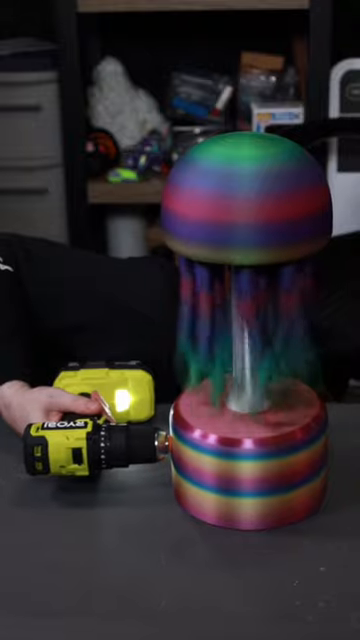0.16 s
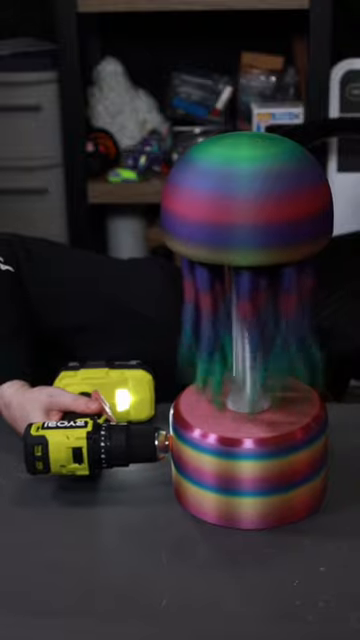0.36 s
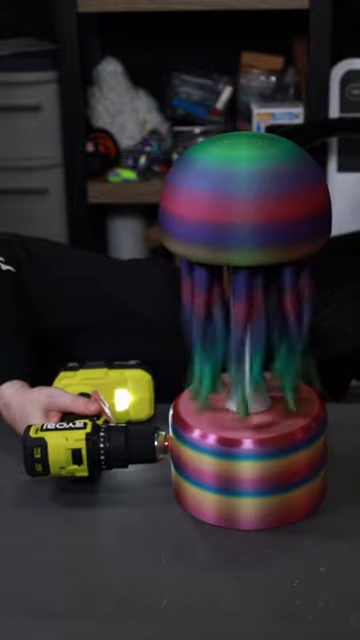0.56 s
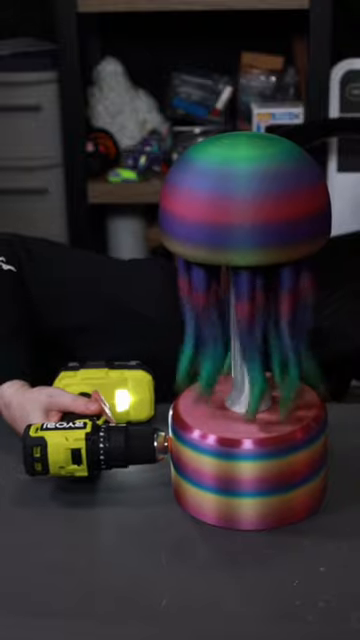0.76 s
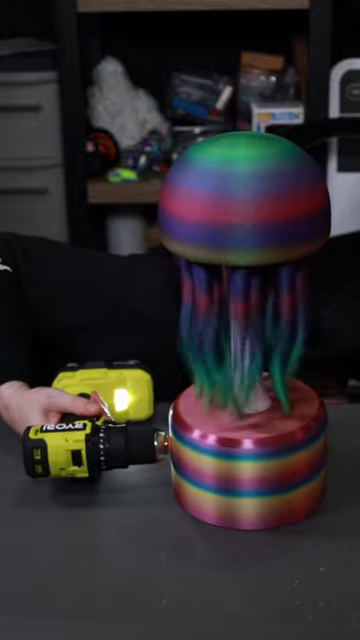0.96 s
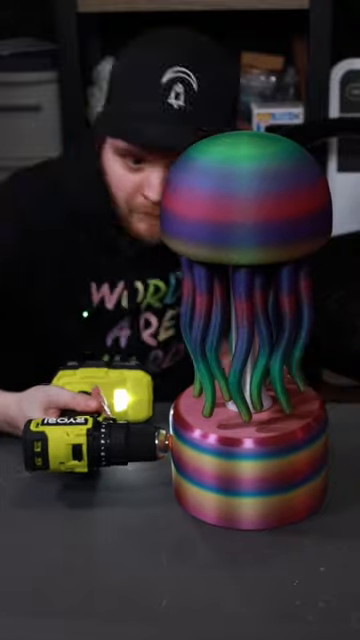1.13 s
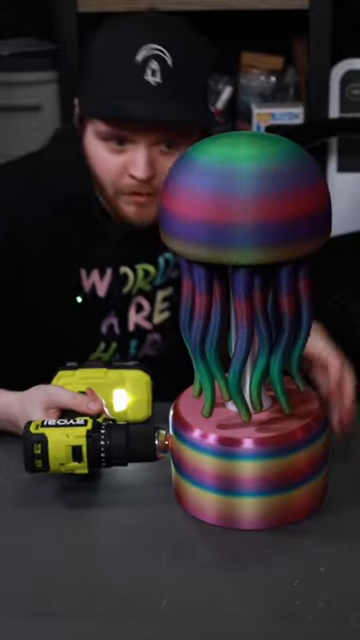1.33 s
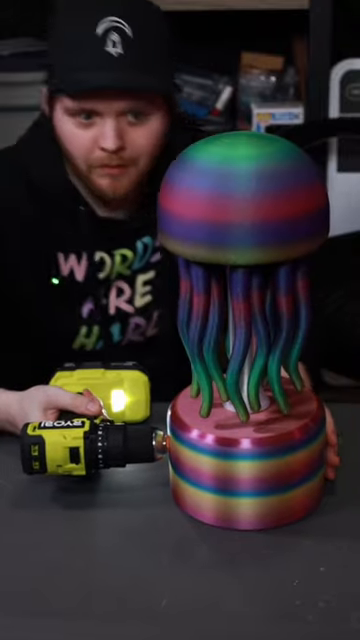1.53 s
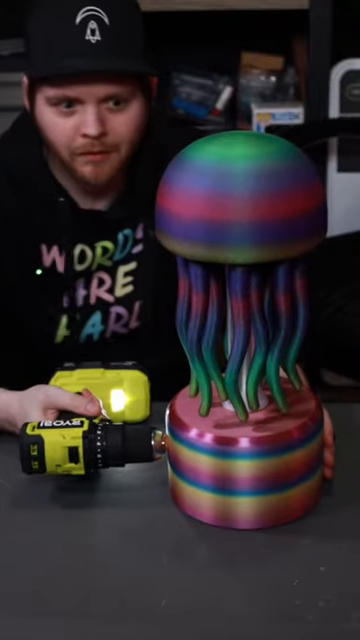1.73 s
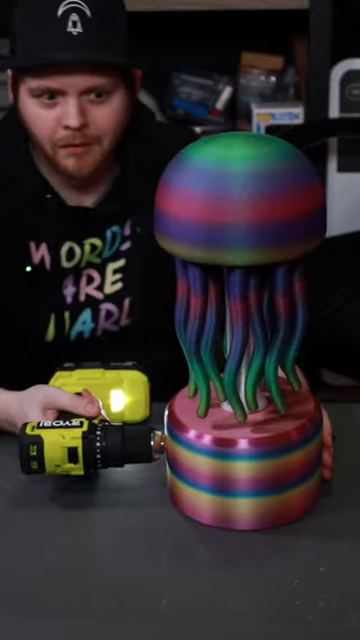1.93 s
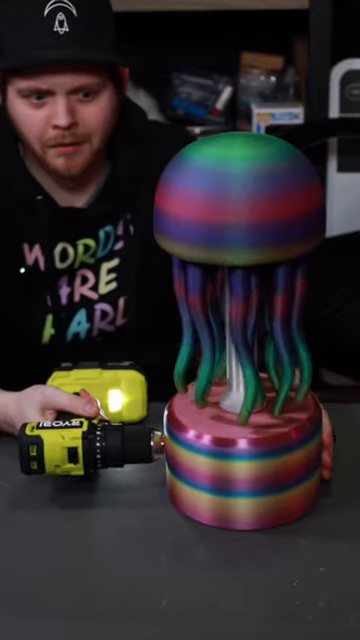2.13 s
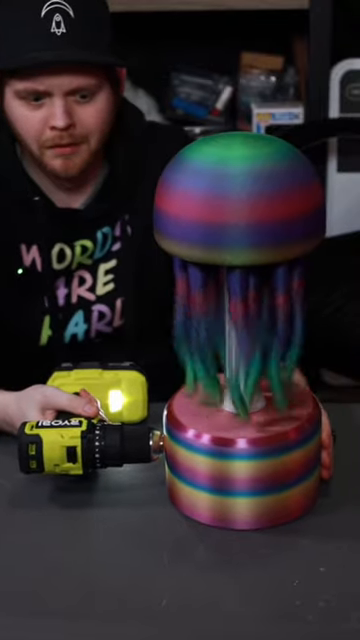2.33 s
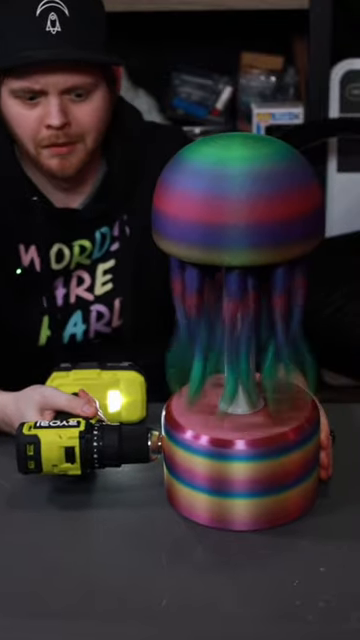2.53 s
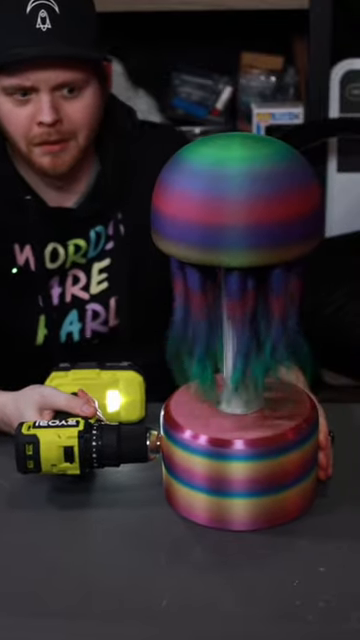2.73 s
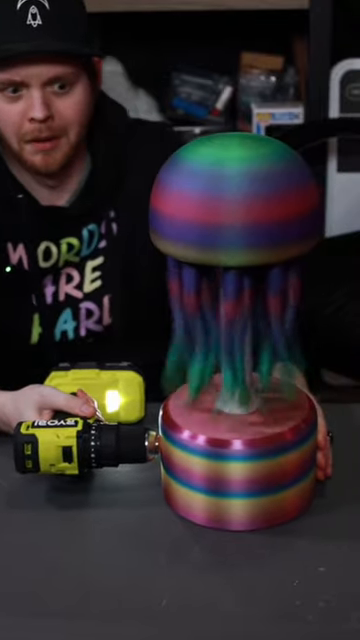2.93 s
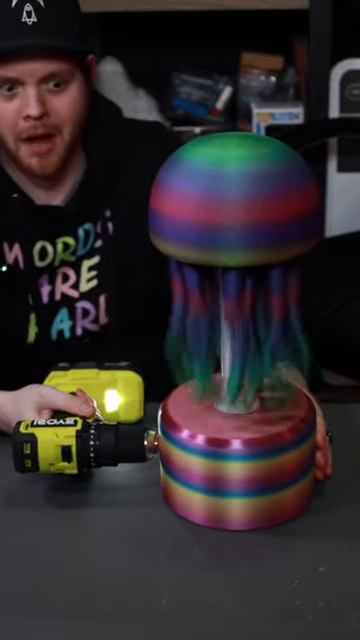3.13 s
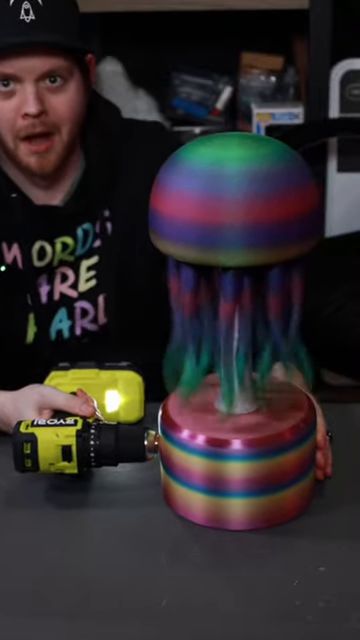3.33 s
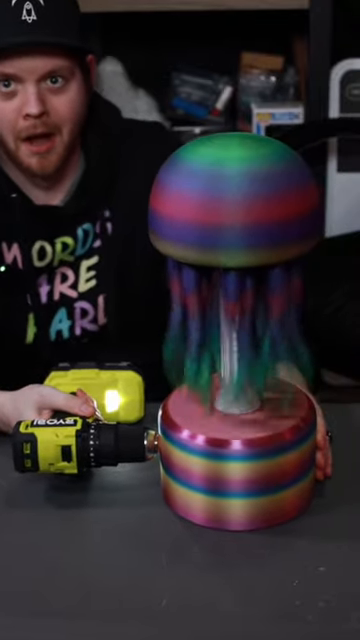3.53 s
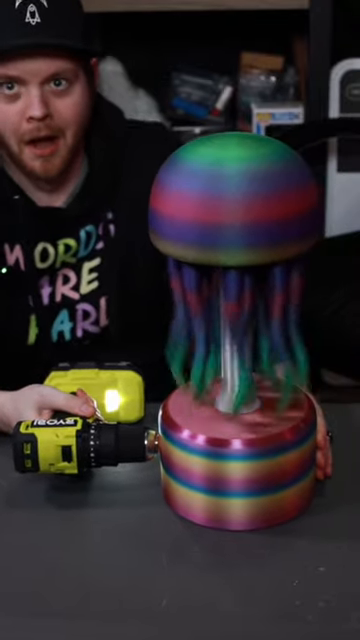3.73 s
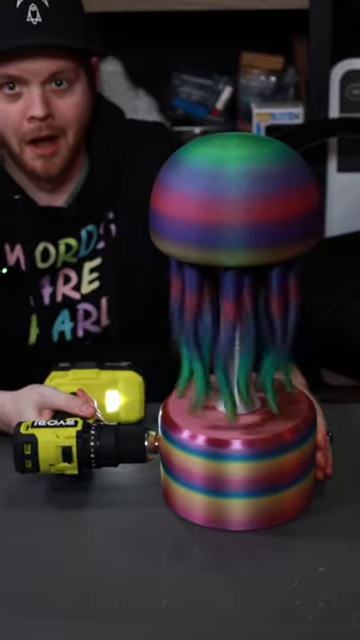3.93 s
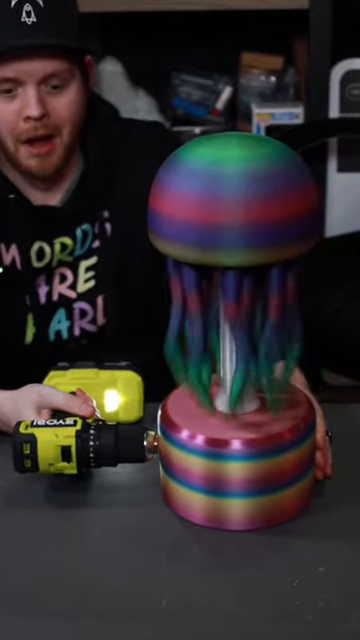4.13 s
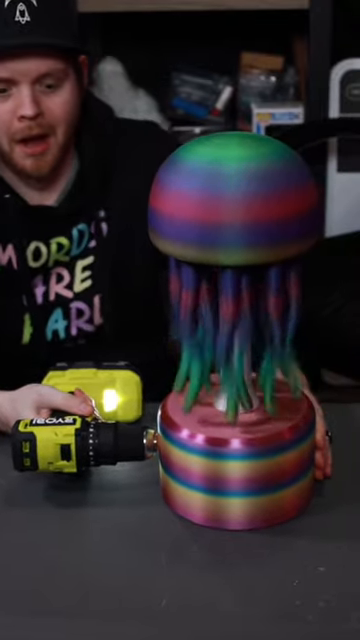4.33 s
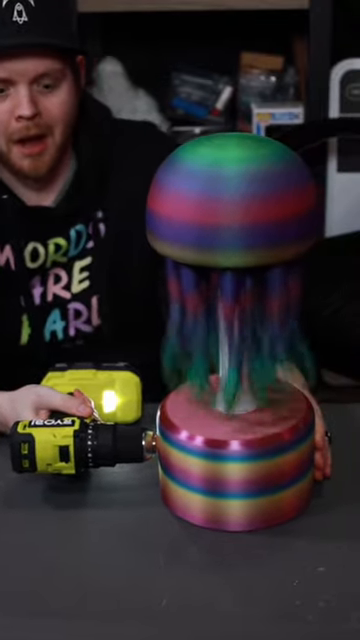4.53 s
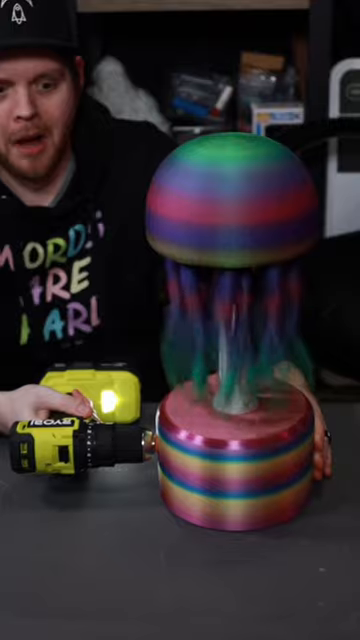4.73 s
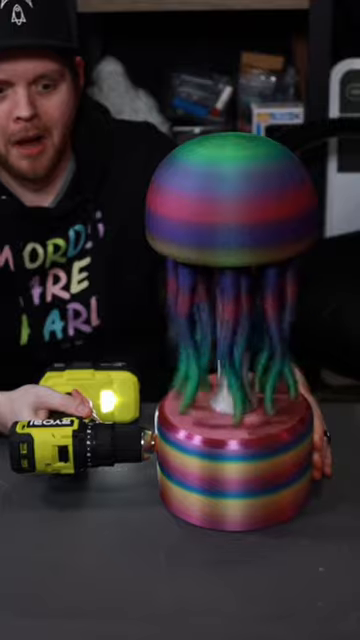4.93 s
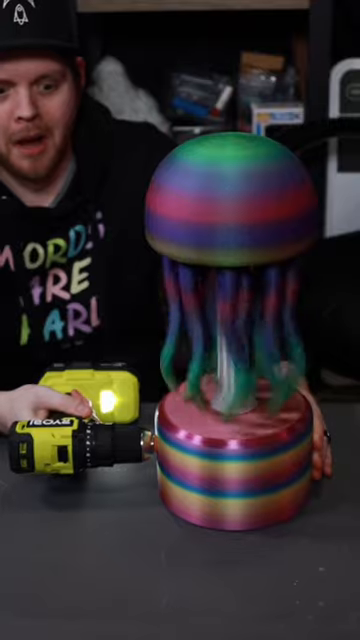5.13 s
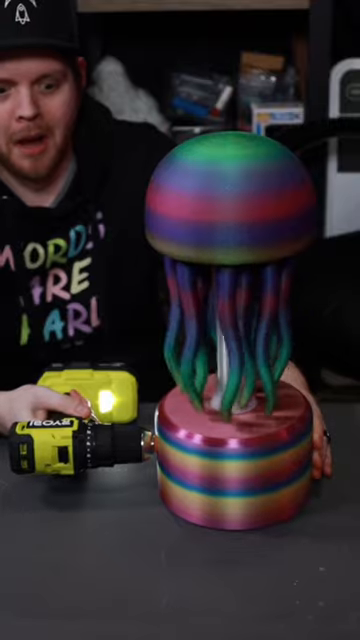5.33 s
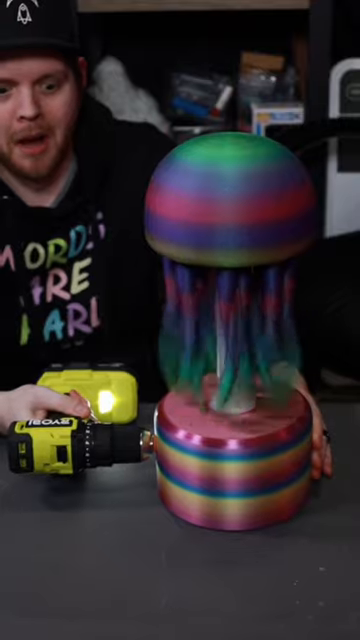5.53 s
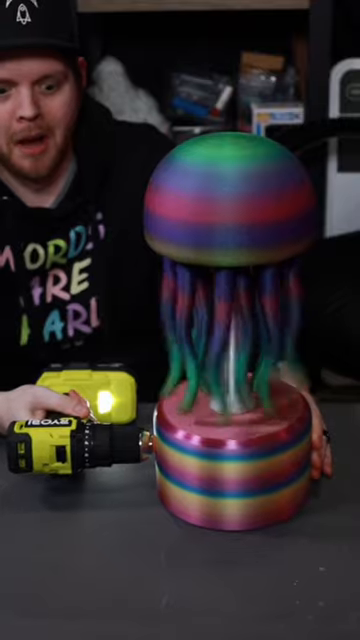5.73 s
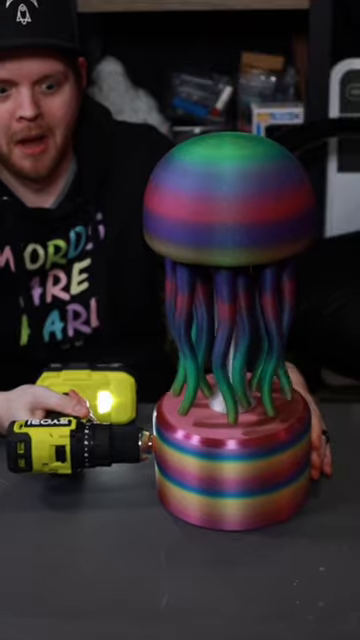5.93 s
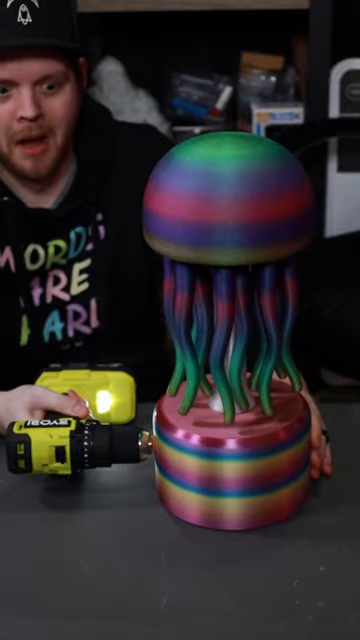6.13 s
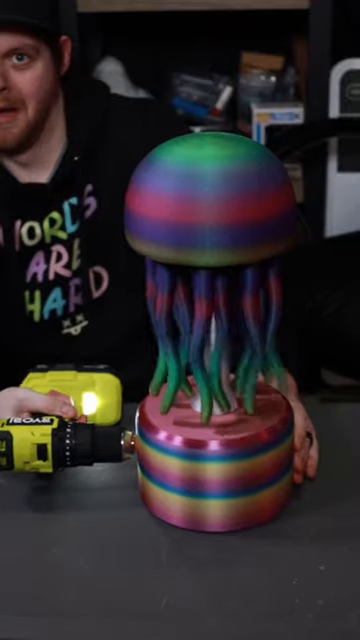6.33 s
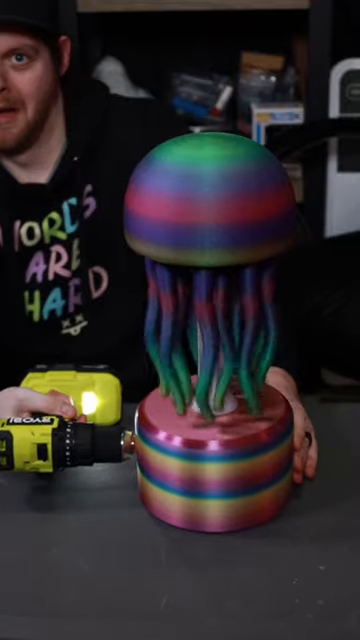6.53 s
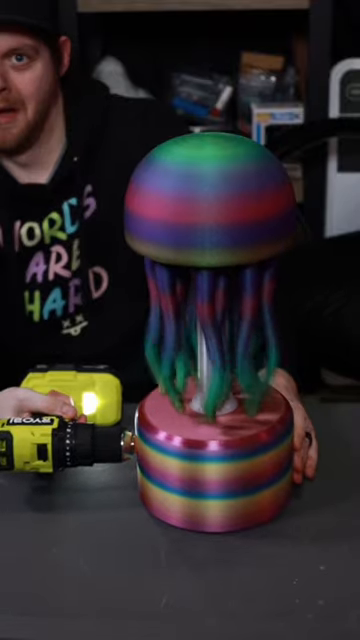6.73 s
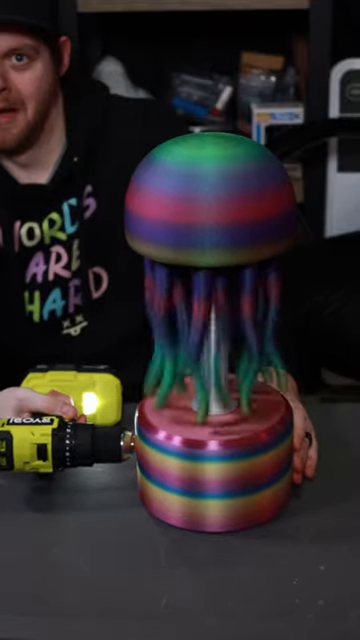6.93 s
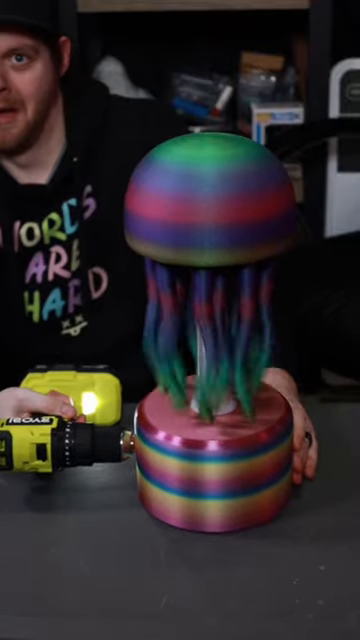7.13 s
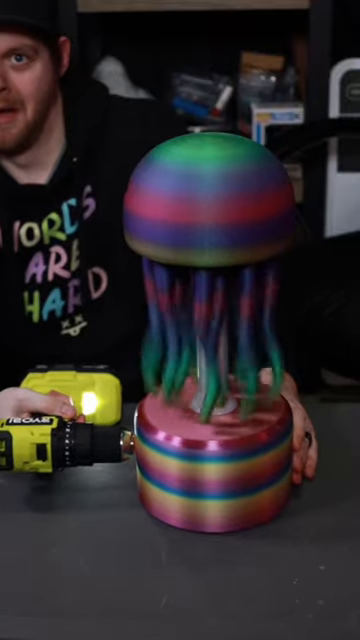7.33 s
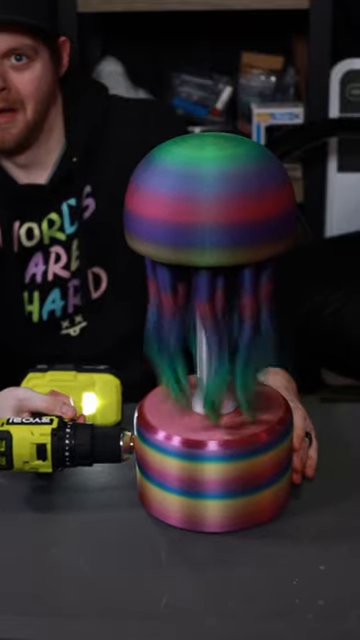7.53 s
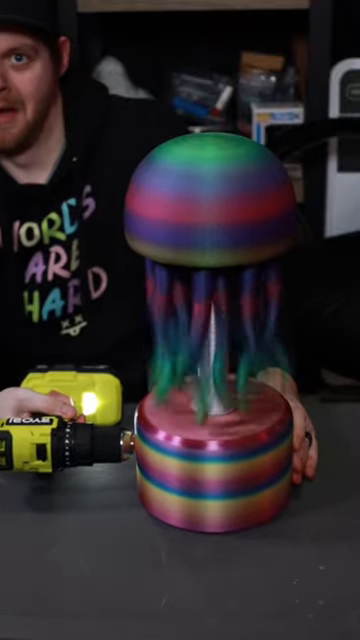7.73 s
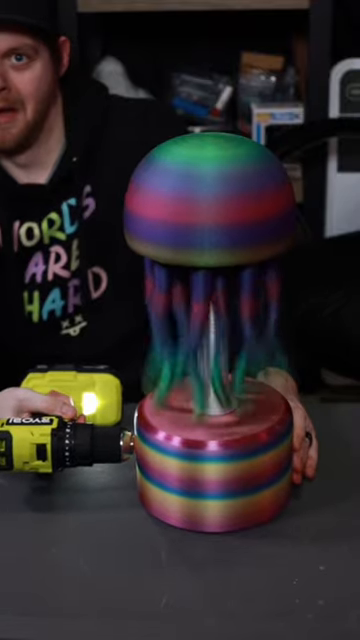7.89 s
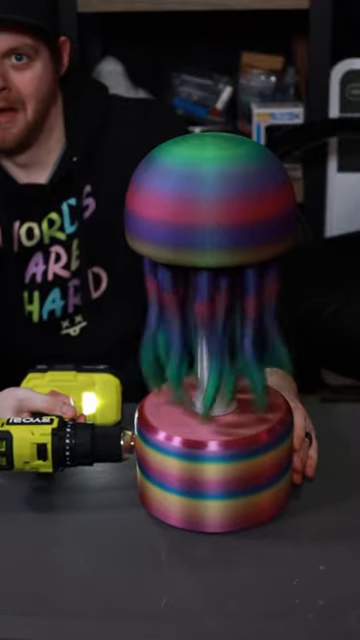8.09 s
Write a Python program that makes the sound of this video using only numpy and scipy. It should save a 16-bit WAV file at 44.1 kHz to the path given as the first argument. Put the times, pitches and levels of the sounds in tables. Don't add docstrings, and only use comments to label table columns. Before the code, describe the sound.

A cordless drill drives a hollow plastic gear toy in rattling bursts, with dry squeaks, sharp clacks and faint room hum in the pauses.

```python
import sys
import numpy as np
from scipy import signal
from scipy.fft import rfft, irfft, next_fast_len
from scipy.io import wavfile
from scipy.ndimage import uniform_filter1d

SR = 44100
rng = np.random.default_rng(int(sys.argv[2]) if len(sys.argv) > 2 else 0)


def bounce(signal):
    frames = np.transpose(np.atleast_2d(signal))
    limited = np.clip(frames, -1, 1)
    pcm = np.round(limited * 32767).astype(np.int16)
    wavfile.write(sys.argv[1], SR, pcm)


def how_loud(loudness_db):
    steps = np.asarray(loudness_db, float) / 20
    return 10 ** steps


N = 364266
TIME = np.arange(N) / SR
SCENE_CHANGE_S = 1.143

# bite t/s, crawl level over full until the drive engages/dB, release t/s,
# coasting loss [dB per s], load on the hollow base/dB
RUNS = [
    (-.3, 0, 1.03, 90, 4),
    (1.913, 10.5, 2.004, 131, 2),
    (2.286, 1.5, 4.17, 217, 2.5),
    (4.316, -6, 5.25, 243, 4),
    (5.403, -12, 6.067, 261, 3),
    (6.222, 0.5, 11, 296, 7),
]
# t/s, skip rate f/Hz, level/dB
BUZZ = [
    (5.74, 190.8, -30),
    (5.78, 188.8, -23),
    (5.9, 192, -24),
    (5.99, 192.2, -25),
    (6.04, 190.6, -28),
    (6.08, 190, -100),
]
# f/Hz, width/Hz, level/dB
SLIP_MODES = [(10400, 2100, -11), (13030, 500, 1), (14300, 1100, -1.5), (15200, 1400, -3.5)]
# t/s, peak level/dB, lower part over it/dB
SETTLE = [
    (1.1702, -49, 8),
    (2.1355, -57, 4),
    (2.1804, -54, 6),
]
# f/Hz, side minus mid level/dB
WIDTH = [(60, -14), (125, -21), (300, -17), (600, -11), (1300, -6), (3000, -6), (8000, -3), (15000, -2)]


def unit(x):
    return x / np.sqrt(np.mean(x ** 2))


def ring(x, modes):
    out = 0
    for k, (hz, width, db) in enumerate(modes):
        b, a = signal.iirpeak(hz, hz / width, fs=SR)
        out = out + (-1) ** k * how_loud(db) * signal.lfilter(b, a, x)
    return out


def band(x, lo_hz, hi_hz):
    return signal.sosfilt(signal.butter(3, [lo_hz, hi_hz], "band", fs=SR, output="sos"), x)


def colour(x, points):
    hz, db = np.transpose(points)
    size = next_fast_len(N)
    f = np.maximum(np.arange(size // 2 + 1) * SR / size, 1)
    weight = how_loud(np.interp(np.log(f), np.log(hz), db))
    return irfft(rfft(x, size) * weight, size)[..., :N]


def walk(rate):
    hold = int(SR / rate)
    steps = np.repeat(rng.standard_normal(N // hold + 1), hold)
    return 1.363 * uniform_filter1d(steps, hold)[:N]


def spell(s, length_s, edge_s):
    return np.clip(np.minimum(TIME - s, s + length_s - TIME) / edge_s + .5, 0, 1)


def burst(length_s, t60_s):
    t = np.arange(int(length_s * SR)) / SR
    return t, np.exp(-np.log(1000) * t / t60_s)


def add(out, s, grain):
    i = int(s * SR)
    out[i:i + len(grain)] += grain[:N - i]


def knocks(rate, spread_db, rub):
    hit = rng.random(N) < rate / SR
    force = np.minimum(rng.exponential(1, N), 4.5)
    sign = np.sign(rng.standard_normal(N))
    return unit(hit * sign * how_loud(spread_db * force)) + rub * rng.standard_normal(N)


def background():
    # f/Hz, level/dB per Hz
    room_tone = [(15, -46), (25, -20), (86, -24), (118, -16), (154, -13), (191, -5.5), (264, -16),
                 (309, -7), (363, -20), (573, -18.5), (15000, -51.5)]
    # f/Hz, level/dB
    hum_tones = [(118.4, -53.5), (193.8, -46.5), (312.2, -64), (403.7, -67), (522.2, -61), (576.0, -55.5),
                 (1416, -72), (3138, -73), (3768, -73)]
    # t/s, gain/dB
    ride = [(0, 9), (1.15, -1.5), (1.5, 4.5), (1.9, 5.5), (2.25, 5.5), (2.6, -6), (4.3, -7), (5.38, -9),
            (6.2, -2), (6.4, 5), (8.26, 1)]
    mid, side = (colour(rng.standard_normal(N), room_tone) * how_loud(0.38 * walk(4.7)) for _ in range(2))
    hum = 0
    for hz, db in hum_tones:
        hum = hum + how_loud(db - 5.5 + 1.1 * walk(12)) * np.sin(2 * np.pi * hz * TIME + 0.6 * walk(3.9))
    air = unit(mid) * how_loud(-53.5)
    side = colour(unit(side), WIDTH) * how_loud(-52)
    gain_db = np.interp(TIME, *np.transpose(ride))
    return (air + hum + side * np.array([[1], [-1]])) * how_loud(gain_db)


def drive():
    # t/s, gear rattle level/dB, pace as cam scrape over the rattle/dB
    effort = [(0, -26.5, -3.5), (.4, -28.5, -5.5), (1.0, -29.5, -3.5), (1.95, -34, -11), (2.1, -17, -13),
              (2.4, -20.5, -3.5), (2.7, -24, -5), (3.4, -24.5, -5.5), (4.15, -29, -8), (4.48, -24, -6.5),
              (4.8, -26, -4.5), (5.5, -25.5, -6), (6.1, -22.5, -5), (6.25, -24, -17.5),
              (6.68, -24.5, -15.5), (7.3, -24, -10.5), (7.42, -23, -8), (8.26, -25, -8.5)]
    # t/s, length/s, rattle gain/dB, hiss gain/dB
    slips = [
        (0.51, 0.039, 1.5, 5),
        (0.627, 0.052, 2.5, 3),
        (0.717, 0.067, 3, -1),
        (0.952, 0.043, 2.5, -1.5),
        (3.773, 0.17, 3.5, 9.5),
        (4.89, 0.17, 2, 10),
        (5.146, 0.13, 2.5, 7.5),
        (5.732, 0.31, 2, 7.5),
        (6.716, 0.27, 4, 3),
    ]
    bite_s, engage_s = 0.026, 0.11
    crawl_dull_db, coast_dull_per_db = -2.5, .3
    free_s = 0.21
    sag_s, sag_db_per_db = 0.061, 0.67
    s, level_db, pace_db = np.transpose(effort)
    level_db, pace_db = np.interp(TIME, s, level_db), np.interp(TIME, s, pace_db)
    shape_db = np.full(N, -90.)
    slip_db, load_db, dull_db = np.zeros(N), np.zeros(N), np.zeros(N)
    for bite, crawl_db, release, loss, load in RUNS:
        on = TIME >= bite
        since = TIME[on] - bite
        load_db[on] = load
        coast_db = -loss * np.maximum(TIME[on] - release, 0)
        bite_db = -28 * np.exp(-3 * since / bite_s)
        shape_db[on] = bite_db + crawl_db * np.clip(1.3 - since / engage_s, 0, 1) + coast_db
        pace_db[on] += crawl_dull_db * np.clip(4 - 4 * since / engage_s, 0, 1)
        dull_db[on] = coast_dull_per_db * np.maximum(coast_db, -36)
    shape_db[(TIME > SCENE_CHANGE_S) & (TIME < RUNS[1][0])] = -90
    for s, length, gain_db, hiss_db in slips:
        racing = spell(s, length, 0.029)
        sag_db = sag_db_per_db * hiss_db * spell(s + length, sag_s, 0.12) * (shape_db > -1)
        level_db = level_db + gain_db * racing - sag_db
        slip_db = slip_db + hiss_db * np.maximum(racing, .5 * spell(s + length, 0.059, 0.026))
        dull_db = dull_db * (1 - min(hiss_db / 9, 1) * spell(s, length + free_s, 0.022))
    return level_db + np.maximum(shape_db, -90), pace_db + dull_db, slip_db, load_db


def clutch():
    # t/s, length/s, first rate f/Hz, last rate f/Hz, share of rattle chopped [0-1]
    ratchets = [
        (.505, .05, 122, 120, .4),
        (.625, .06, 124, 120, .4),
        (3.778, .16, 170, 146, .45),
        (4.878, .175, 178, 166, .58),
        (5.14, .13, 192, 148, .6),
        (5.735, .31, 188.5, 193, .35),
    ]
    decay_cycles, slop_cycles = .33, .09
    gain, slop = np.ones(N), slop_cycles * walk(120)
    for s, length, first_hz, last_hz, share in ratchets:
        since = TIME - s
        sweep = (last_hz - first_hz) * since ** 2 / length / 2
        cycle = (first_hz * since + sweep + slop) % 1
        click = unit(np.exp(-cycle / decay_cycles))
        gain = gain + share * spell(s, length, .01) * (click - 1)
    return gain


def motor(teeth, slip_db):
    # t/s, length/s, gain/dB, pitch over the usual f/Hz
    sings = [
        (-.1, 0.22, 14, 60),
        (0.184, 0.23, 15.5, 40),
        (.12, .08, -1, 60),
        (.41, 0.091, 3, 70),
        (2.269, 0.039, 26.5, 49.5),
        (2.32, 0.01218, 18, -420),
        (2.333, 0.018, 23, -62.5),
        (4.355, 0.27, 13, 19),
        (4.651, 1.4, 9, -70),
        (7.405, 1, 7.5, -30),
    ]
    # f/Hz, width/Hz, level/dB
    casing = [(152.7, 33, -7), (216.4, 18, 1), (118, 52, -14.5)]
    whine_hz, whine_db, drone_db = 2467, -20.5, -17
    sing_db, sing_hz = np.zeros(N), np.zeros(N)
    for s, length, db, hz in sings:
        singing = spell(s, length, 0.02)
        sing_db += db * singing
        sing_hz += hz * singing
    flutter = 1 + .002 * walk(40) + .004 * walk(250) + .002 * walk(9)
    phase = 2 * np.pi * np.cumsum((whine_hz + sing_hz) * flutter) / SR
    whine = np.sin(phase) * how_loud(whine_db + sing_db + 1.0 * walk(30))
    drone = unit(band(ring(ring(teeth, casing), casing), 99, 430))
    return how_loud(3.5) * whine + drone * how_loud(drone_db - 0.95 * slip_db + 1.7 * walk(12) + 4)


def gears(drill):
    base_modes = [(255, 12.7, -1.5), (327, 36, -4), (391, 34, -4.5), (452, 58, 1.5), (567, 78, 2.5),
                  (768, 123, -3)]
    hollow_modes = [(334, 31.3, 2), (388, 35.4, 1), (452.8, 61, 0)]
    housing_modes = [(936, 263, -4), (1126, 65, 3.5), (1320, 204, -1.5), (1755, 240, 1.5), (1942, 250, 1.5),
                     (2450, 454, -2)]
    arm_modes = [(2730, 464, 3), (3530, 650, 3), (4230, 780, -2)]
    scrape_modes = [(4620, 1540, 5.5), (5780, 910, 8.5), (6700, 1180, 3.5)]
    hiss_modes = [(8000, 870, -1), (9770, 3000, 3.5), (11300, 2550, 5), (14400, 1900, -8)]
    slack_s, slack_db = 0.017, -11
    rattle_db, pace_db, slip_db, load_db = drive()
    scrape_db = pace_db + 0.55 * slip_db
    hiss_db = -10 + 1.72 * pace_db + slip_db
    skipping = np.interp(TIME, [BUZZ[0][0], BUZZ[1][0], BUZZ[-2][0], BUZZ[-1][0]], [0, 1, 1, 0])
    buzzing = np.interp(TIME, [BUZZ[1][0], BUZZ[2][0], BUZZ[-2][0], BUZZ[-1][0]], [0, 1, 1, 0])
    slip_db = slip_db + 18 * buzzing
    base_db = np.minimum(-8 - 0.28 * pace_db, -1) - 0.59 * slip_db
    base_db = base_db + slack_db * sum(spell(run[0], slack_s, 0.005) for run in RUNS)

    teeth = knocks(rate=1400, spread_db=2.5, rub=0.83) * how_loud(0.06 * walk(22))
    cams = knocks(rate=1500, spread_db=3.5, rub=0.8) * how_loud(1.6 * walk(40))
    fine = knocks(rate=1400, spread_db=5.0, rub=1.0) * how_loud(2.6 * walk(40))
    chop = clutch()
    arm_knocks = (.5 * fine + cams[::-1]) * chop
    teeth, cams, fine = teeth * np.sqrt(chop), cams * chop, fine * chop

    housing = unit(band(ring(teeth, housing_modes), 695, 3900))
    upper = ring(housing, [(2530, 1100, 0)]) * (how_loud(0.2 * np.minimum(pace_db + 7.5, 3)) - 1)
    housing = (housing + upper) * how_loud(-1.5 - 7.5 * skipping + 1.65 * walk(30))
    dome = unit(ring(cams, [(3520, 130, 0)])) * how_loud(-18) * skipping
    base = unit(band(ring(teeth, base_modes), 119, 1016)) * how_loud(base_db - 1.0 - 0.3 * load_db)
    arms = unit(ring(arm_knocks, arm_modes)) * how_loud(0.53 * scrape_db - 3 - 3.0 * skipping)
    scrape = unit(band(ring(cams, scrape_modes), 4200, 8500))
    scrape = scrape * how_loud(scrape_db - 3.5 - 3.0 * skipping + 0.97 * walk(38))
    hiss = unit(band(ring(fine, hiss_modes), 7600, 16000)) * how_loud(0.59 * hiss_db - 10.5)
    slip = unit(band(ring(cams, SLIP_MODES), 11600, 20000)) * how_loud(1.26 * hiss_db + 3.0 + 1.4 * walk(30))
    boom = unit(ring(ring(teeth, hollow_modes), hollow_modes))
    boom = boom * how_loud(0.81 * base_db - 11.5 + load_db + 1.6 * walk(14))
    total = boom + base + housing + dome + arms + scrape + hiss + slip
    if drill:
        total = total + motor(teeth, np.minimum(slip_db, 11))
    return how_loud(rattle_db - 3) * total


def chirps():
    # t/s, peak level/dB, f/Hz
    strays = [(0.0248, -19, 6600), (0.0862, -22, 6520), (0.128, -18, 5660), (0.1595, -21, 6170),
              (0.2484, -18, 6400), (0.3293, -19, 5910), (0.3691, -16, 5660), (0.3855, -19, 5750),
              (0.7063, -20, 5610), (1.923, -28, 4700), (2.2817, -38, 5360), (2.3111, -21, 4750),
              (2.37, -15, 5200), (2.416, -12, 5750), (2.476, -11.5, 5570), (2.5087, -22, 5700),
              (2.5326, -18, 5830), (2.5498, -16, 5880), (2.6264, -18, 5860), (2.685, -8.5, 5840),
              (2.8449, -11.5, 5950), (2.8948, -17, 5830), (2.9203, -17, 5640), (2.9731, -21, 5750),
              (3.001, -12.5, 5700), (3.022, -22, 5750), (3.1584, -12, 5480), (3.208, -15, 5860),
              (3.314, -18, 5540), (3.415, -21, 5600), (3.475, -14, 5650), (3.5304, -26, 5600),
              (3.8896, -30, 5270), (4.3206, -42, 5699), (4.412, -17, 4620), (4.4543, -12, 5570),
              (4.485, -14, 5620), (4.548, -16, 6650), (4.683, -16, 6120), (4.7283, -16, 6060),
              (4.758, -18, 5100), (4.8804, -20, 5100), (5.009, -22, 5500), (5.1504, -16, 5940),
              (5.5092, -19, 5940), (5.65, -16, 6040), (5.697, -19, 5870)]
    # first turn t/s, end t/s, peak level/dB, f/Hz, turns per s
    squeals = [
        (.01, .41, -22, 6170, 25),
        (0.476, 1.02, -28, 5440, 21),
        (2.373, 3.6, -22, 5745, 19.04),
        (4.413, 4.78, -21, 6010, 21.7),
        (5.507, 5.76, -24, 5990, 19.4),
    ]
    spread_hz = 205
    rows = [(s, db + 0.5, hz) for s, db, hz in strays]
    step = np.arange(128)
    steady = step % 12 == 0
    weak_db = np.array([0, -1.5, -1, -1.5])[step % 4]
    for first, end, peak_db, hz, rate in squeals:
        late, force, pitch = rng.standard_normal((len(step), 3)).T
        s = first + step / rate / 4 + .004 * late * ~steady
        db = peak_db + weak_db + 0.97 * force * ~steady
        hz = hz + spread_hz * (rate / 19) ** 3 * pitch * np.where(steady, .3, 1)
        rows += [row for row in zip(s, db, hz) if 0 < row[0] < end]
    out = np.zeros(N)
    t, decay = burst(.05, .03)
    swell = 1 - np.exp(-t / .004)
    wobbles = uniform_filter1d(rng.standard_normal((len(rows), len(t))), size=50)
    for (s, db, hz), wobble in zip(rows, wobbles):
        tone = np.sin(2 * np.pi * hz * t + 5.5 * wobble)
        add(out, s, how_loud(db + 5) * swell * decay * tone)
    return out


def lumps():
    # t/s, peak level/dB, f/Hz
    thuds = [(2.308, -16.5, 202), (4.74, -23, 450), (5.595, -19, 427), (5.645, -15, 525),
             (5.677, -16, 461), (5.726, -20, 348), (6.237, -16.5, 584), (6.36, -11.5, 400),
             (6.4, -17, 388), (6.451, -12.5, 546), (6.547, -19, 452), (6.587, -15, 586),
             (6.627, -17, 388), (6.721, -17, 412), (6.811, -12.5, 442), (6.916, -28, 340),
             (7.15, -15, 348), (7.243, -32, 352), (7.278, -18.5, 534), (7.455, -18, 388),
             (7.573, -20, 400), (7.739, -16.5, 345), (7.9, -17, 456), (8.065, -20, 374),
             (8.129, -15.5, 377)]
    further_thuds = [(0.253, -23, 388), (0.58, -29, 620), (0.718, -26, 516), (0.952, -31, 567),
                     (1.941, -18, 700), (2.305, -14, 623), (2.41, -14, 438), (2.469, -23, 570),
                     (2.655, -30, 513), (2.79, -21, 670), (2.945, -17, 700), (3.038, -30, 390),
                     (3.228, -18.5, 547), (3.403, -23, 546), (3.583, -22, 385), (3.653, -19.5, 475),
                     (3.88, -26, 567), (3.96, -21.5, 541), (4.032, -17.5, 550), (4.335, -29, 552),
                     (4.498, -17, 448), (4.548, -17, 452), (4.859, -17, 560), (5.136, -22, 580)]
    # t/s, peak level/dB, f/Hz
    heavy_clacks = [(5.755, -12, 2370), (6.2932, -30, 1670), (6.4015, -16, 1630), (6.5072, -15, 2020),
                    (6.5691, -23, 2040), (6.632, -28, 2400), (6.7238, -12, 2080), (6.7577, -8, 2050),
                    (6.775, -13, 1100), (6.813, -8, 2450), (6.9, -22, 1350), (6.955, -26, 1070),
                    (7.0625, -11, 2460), (7.2251, -21, 2200), (7.3428, -15, 1780), (7.6412, -13, 1900),
                    (7.8213, -23, 1700), (7.8572, -25, 1570), (7.954, -18, 1910), (8.0677, -12, 2420)]
    fast_clacks = [(0.086, -20, 2540), (0.243, -25, 2470), (0.296, -16, 2530), (0.342, -15, 1670),
                   (0.483, -29, 1820), (0.51, -17, 2500), (0.609, -22, 1730), (0.658, -22, 1330),
                   (0.76, -14, 2930), (0.826, -15, 2100), (0.894, -14, 2430), (0.956, -18, 1966),
                   (1.026, -22, 2080), (1.921, -15, 2450), (1.944, -12, 956), (2.062, -16, 1110),
                   (2.286, -8, 2510), (2.703, -18, 1450), (2.892, -17, 1130), (2.998, -13, 1124),
                   (3.063, -20, 1120), (3.12, -18, 2060), (3.151, -13, 1760), (3.199, -12, 2150),
                   (3.476, -19, 1046), (3.528, -17, 1070), (3.57, -22, 1300), (3.741, -13, 2270),
                   (3.769, -12, 1104), (3.826, -15, 1820), (3.884, -15, 2000), (3.955, -21, 2100),
                   (4.018, -29, 965), (4.069, -30, 1100), (4.117, -18.5, 1090), (4.321, -32, 1770),
                   (4.367, -16, 2570), (4.41, -20, 2600), (4.553, -16, 2570), (4.602, -18, 2540),
                   (4.631, -15, 2480), (4.754, -12, 2100), (4.868, -19, 2530), (4.895, -17, 1340),
                   (5.158, -21, 1160), (5.192, -14, 2320), (5.413, -36, 1120), (5.511, -19, 1110),
                   (5.597, -21, 2430), (5.651, -13, 1180)]
    rows = [(*row, 35) for row in list(thuds) + list(further_thuds)]
    rows += [(*row, 40) for row in list(heavy_clacks) + list(fast_clacks)]
    out = np.zeros(N)
    wobbles = uniform_filter1d(rng.standard_normal((len(rows), int(.12 * SR))), size=90)
    for (s, db, hz, cycles), wobble in zip(rows, wobbles):
        t, decay = burst(.12, cycles / hz)
        push = 1 - np.exp(-t * hz / 1.8)
        add(out, s, how_loud(db) * decay * push * np.sin(2 * np.pi * hz * t + 5 * wobble))
    return band(out, 143, 5800)


def ticks():
    # t/s, peak level/dB, lower part over it/dB
    arm_clicks = [(0.6399, -21, -4), (0.7592, -18.5, 9.5), (0.9942, -19, 8), (2.2817, -45, 14),
                  (2.4329, -12, 14), (2.4813, -22, -1), (2.5386, -16, -3), (2.6836, -25, 8),
                  (2.7616, -21, 4), (2.8225, -15, 1), (3.1108, -25, 3), (3.3129, -17, 1), (3.5705, -17, -1),
                  (3.7904, -14, 2), (4.3204, -36, 16), (4.4039, -24, 12), (4.4997, -12.5, 12),
                  (4.7552, -10, 9), (4.8893, -23, -1), (5.1397, -17.5, -3), (5.7443, -22, 5),
                  (6.4359, -35, 8), (6.5043, -30, 15), (6.7696, -25, 16), (6.8265, -24, 14),
                  (6.8819, -22, 12), (7.071, -18, 12), (7.1548, -35, 6), (7.2336, -21, 2), (7.7674, -21, 2),
                  (8.0048, -23, 5), (8.0677, -20, 3.5), (7.4054, -19, 13), (7.5037, -10, 6.5),
                  (7.5872, -16, 14.5), (7.668, -21.5, 7), (7.8211, -19, 1), (7.9199, -13, 8.5),
                  (8.107, -18.5, 8), (8.16, -13.5, 10), (8.2435, -21, 14), (4.5492, -24, 9),
                  (4.6255, -22, 0), (4.658, -20, 2), (4.7203, -22, 2), (4.8136, -22, 0), (4.8745, -19, 4)]
    bright, dull = np.zeros(N), np.zeros(N)
    t, decay = burst(.03, .013)
    for s, db, low_db in list(arm_clicks) + list(SETTLE):
        crack = decay * rng.standard_normal(len(t))
        add(bright, s, how_loud(db) * crack)
        add(dull, s, how_loud(db + low_db - 8) * crack)
    top = how_loud(-1.5) * ring(band(bright, 7300, 18400), SLIP_MODES)
    return top + how_loud(-7.5) * band(bright, 7300, 12400) + band(dull, 1800, 7100)


def rustle():
    cloth = unit(band(rng.standard_normal(N), 1800, 6200))
    return cloth * how_loud(-61.5 + 1.4 * walk(39.7)) * spell(1.4, .1, 0.086)


def bites():
    # t/s, peak level/dB, f/Hz, t60/s
    train_clacks = [(1.922, -4, 2300, 0.034), (1.942, 0.5, 710, 0.12), (2.282, -16, 2200, 0.046),
                    (2.306, -2.5, 1900, 0.16), (4.32, -20, 2200, 0.036), (4.335, -14, 1900, 0.048),
                    (5.413, -40, 1133, 0.12), (6.238, -3, 1440, 0.028), (2.307, -20, 190, 0.081),
                    (2.226, -39, 1600, 0.073), (6.21, -37, 420, .06), (5, -1, 770, 0.022)]
    out = np.zeros(N)
    for s, db, hz, t60_s in train_clacks:
        t, decay = burst(0.13, t60_s)
        clack = ring(rng.standard_normal(len(t)), [(hz, 0.78 * hz, 0), (2.1 * hz, 1.5 * hz, -7)])
        add(out, s, how_loud(db - 12.0) * unit(clack) * decay * (1 - np.exp(-t / 0.0011)))
    return out


def thump():
    out = np.zeros(N)
    t_ms = np.arange(-200, 900) / SR * 1000
    dip = np.exp(-np.abs(t_ms / .33) ** 1.5)
    swing = .33 * np.exp(-((t_ms - 2.6) / 1.7) ** 2)
    add(out, 4.4968, how_loud(-5) * (swing - dip))
    return out * np.array([[.55], [1]])


def buzz():
    # multiple, level/dB
    orders = [(1, -15), (2, -7), (3, 1), (4, -2), (5, -2), (6, -4), (7, -4), (8, -3), (9, -9), (10, -3),
              (11, -2), (12, -4), (13, -8), (14, -10), (15, -9), (16, -11), (17, -11), (18, -6), (19, -8),
              (20, -15), (21, -13), (22, -13)]
    s, hz, db = np.transpose(BUZZ)
    rate_hz = np.interp(TIME, s, hz) * (1 + 0.00175 * walk(30))
    phase = 2 * np.pi * np.cumsum(rate_hz) / SR
    stack = 0
    for k, order_db in orders:
        stack = stack + how_loud(order_db + .1 * k * walk(50)) * np.sin(k * phase - 22 * np.sqrt(k))
    return -unit(stack) * how_loud(np.interp(TIME, s, db, left=-120, right=-120))


def scene():
    # f/Hz, left minus right level/dB
    tilt = [(60, -0.5), (125, 0), (380, -.3), (700, -1.2), (1300, -2.2), (3000, -3), (5500, -3),
            (8000, -2.5), (15000, -1.5)]
    drill_spot = gears(drill=True) + chirps() + bites()
    toy_spot = gears(drill=False) + ticks() + lumps() + buzz() + rustle()
    spots = np.array([drill_spot, toy_spot])
    t, room = burst(.3, 0.21)
    _, table = burst(.3, .05)
    early = table + how_loud(-8) * room
    tails = rng.standard_normal((3, len(t))) * [room * (t > .002), early, early]
    tails = tails / np.linalg.norm(tails, axis=1, keepdims=True)
    direct = spots.sum(axis=0)
    mid = direct + how_loud(-9.5) * band(signal.fftconvolve(direct, tails[0])[:N], 810, 17000)
    side = signal.fftconvolve(spots, tails[1:], axes=1)[:, :N].sum(axis=0)
    side = colour(side, WIDTH) * how_loud(-1.)
    lean = colour(mid, [(hz, db / 2) for hz, db in tilt]) - mid
    lean = lean * np.interp(TIME, [5.3, 5.5], [1.2, .7])
    gap = (TIME > SCENE_CHANGE_S) & (TIME < SETTLE[0][0] - .002)
    kept = np.where(gap, 0, 1 - .55 * spell(SCENE_CHANGE_S, .2, .01))
    return kept * (mid + (side + lean) * np.array([[1], [-1]])) + thump() + background()


def top_cut(x):
    return signal.sosfilt(signal.butter(12, 17060, fs=SR, output="sos"), x)


def record(dry):
    rounded = .8 * np.tanh(dry / .8)
    cut = signal.sosfilt(signal.ellip(10, .2, 80, 15850, fs=SR, output="sos"), rounded)
    cut = signal.sosfilt(signal.butter(2, 32, "high", fs=SR, output="sos"), cut)
    return top_cut(cut)


dry = scene()
out = record(dry)
bounce(out)
```